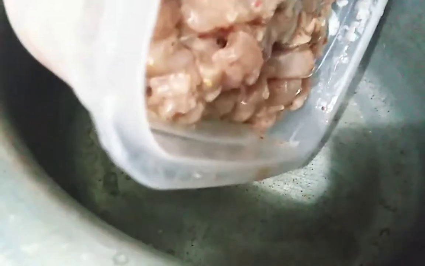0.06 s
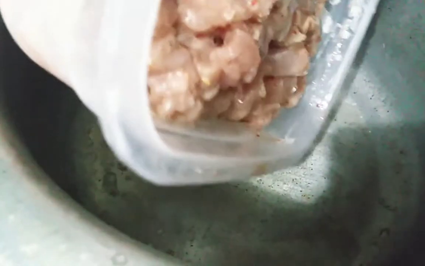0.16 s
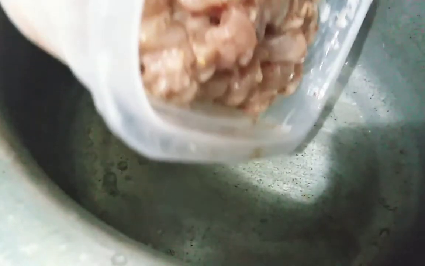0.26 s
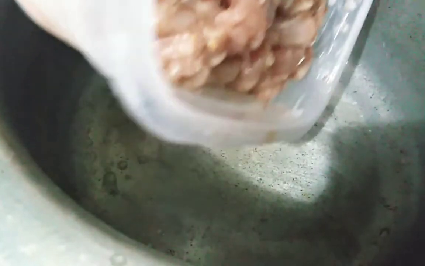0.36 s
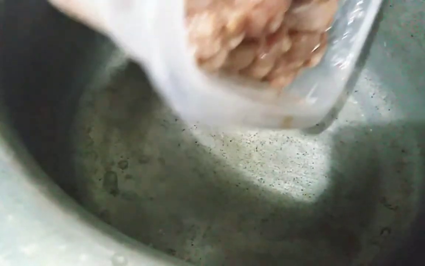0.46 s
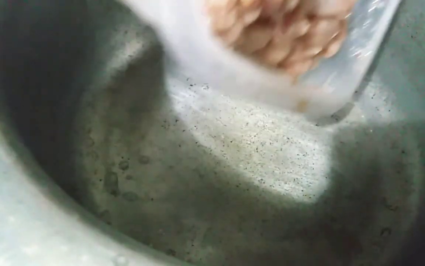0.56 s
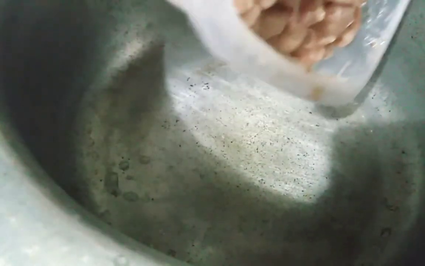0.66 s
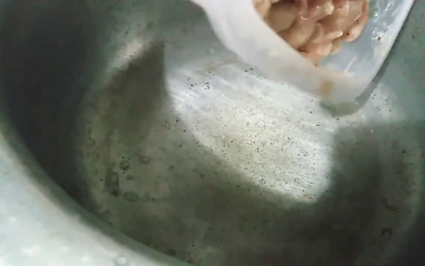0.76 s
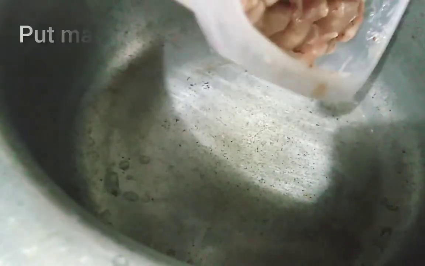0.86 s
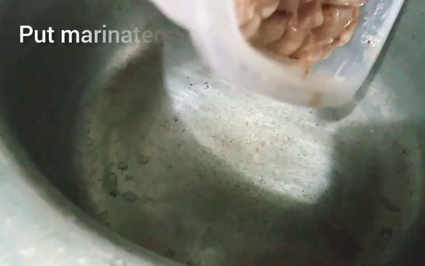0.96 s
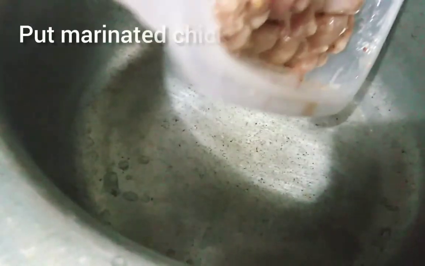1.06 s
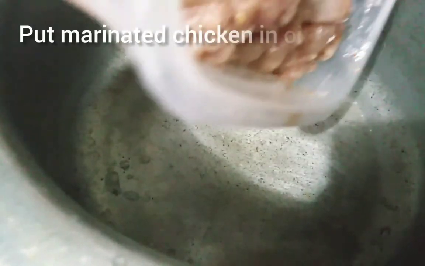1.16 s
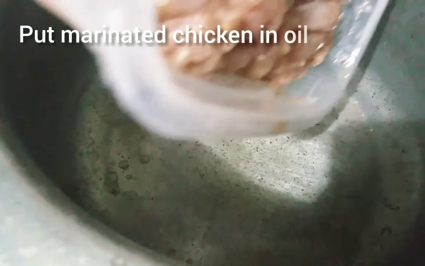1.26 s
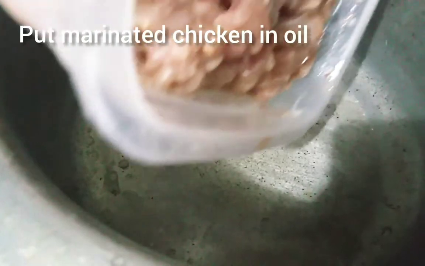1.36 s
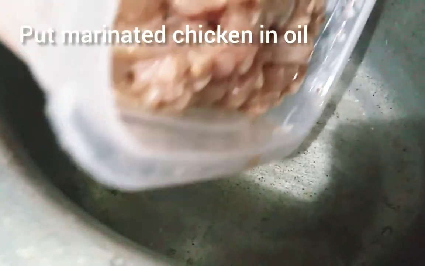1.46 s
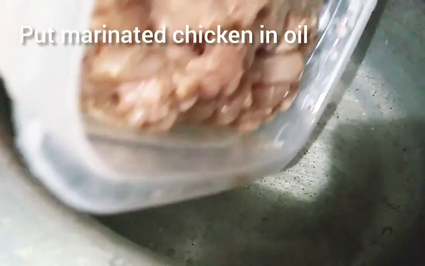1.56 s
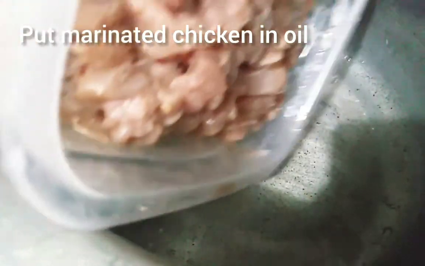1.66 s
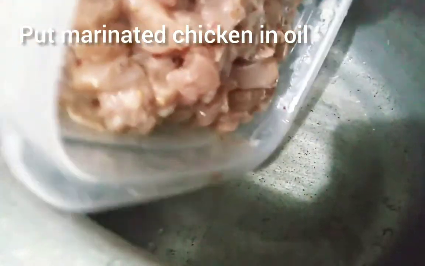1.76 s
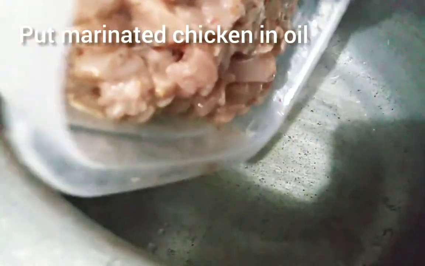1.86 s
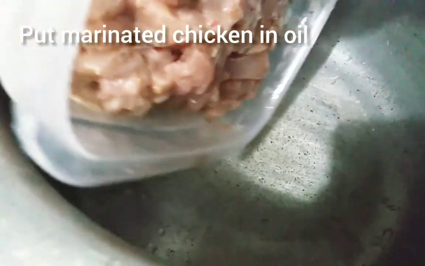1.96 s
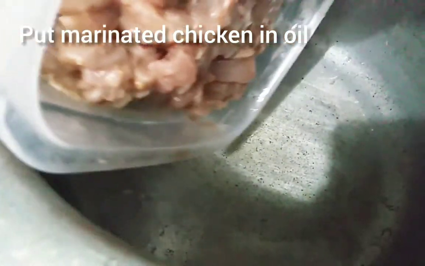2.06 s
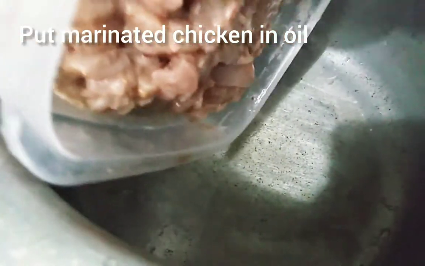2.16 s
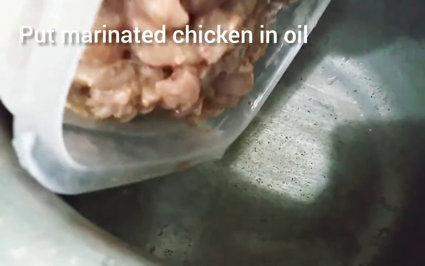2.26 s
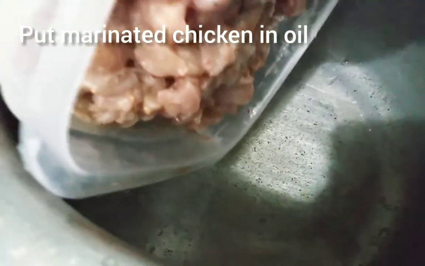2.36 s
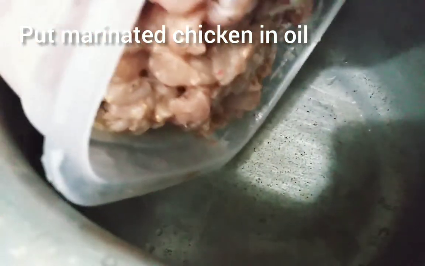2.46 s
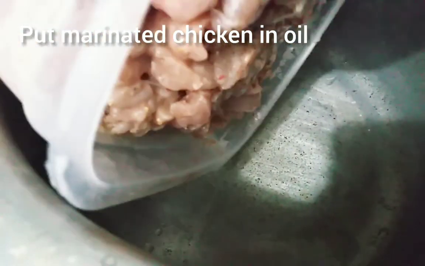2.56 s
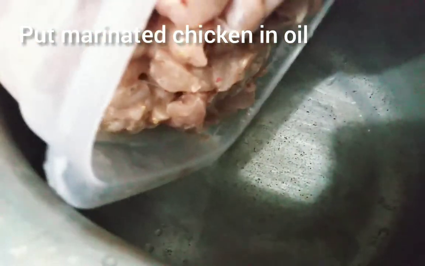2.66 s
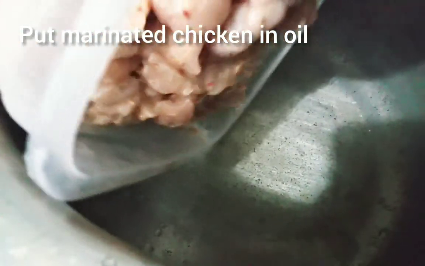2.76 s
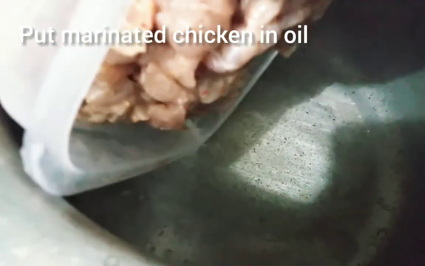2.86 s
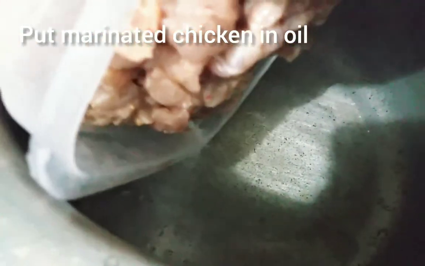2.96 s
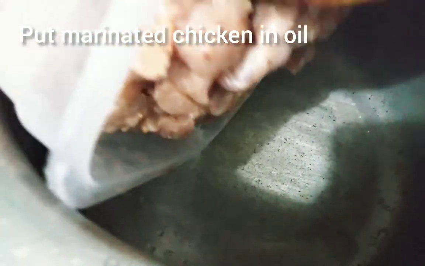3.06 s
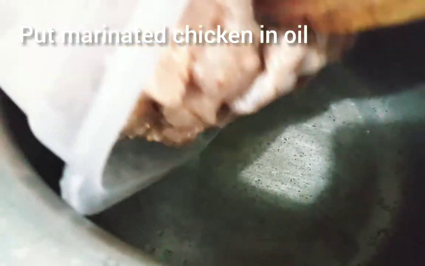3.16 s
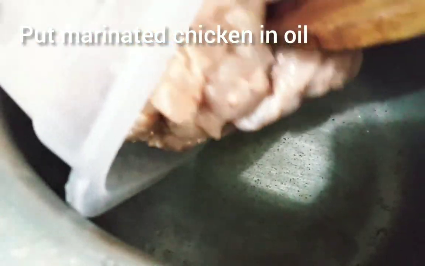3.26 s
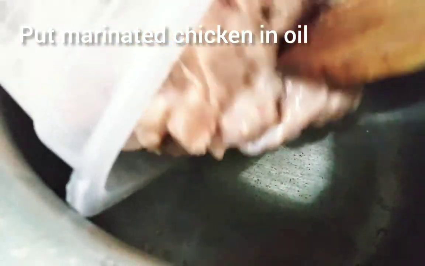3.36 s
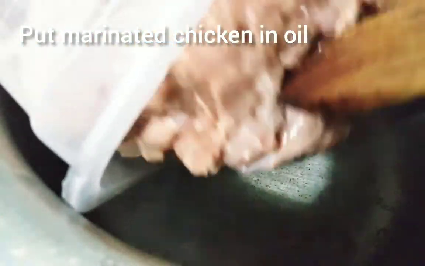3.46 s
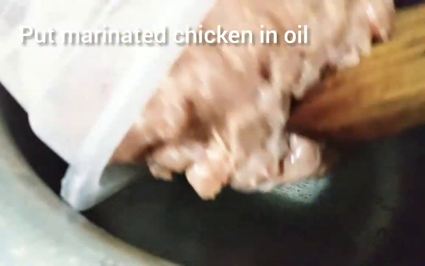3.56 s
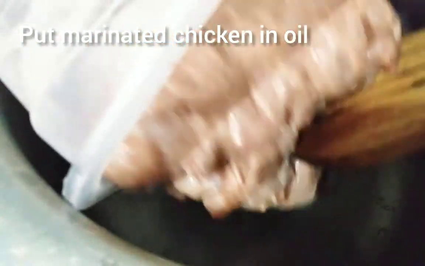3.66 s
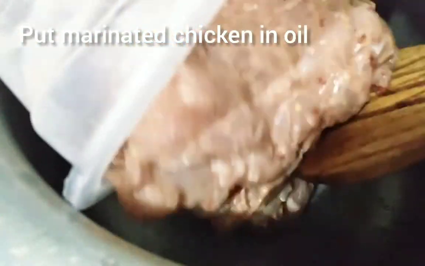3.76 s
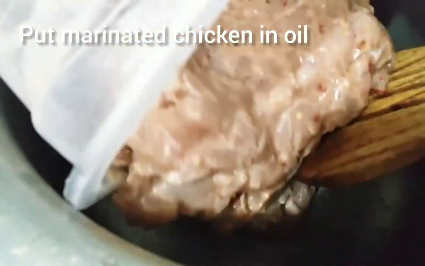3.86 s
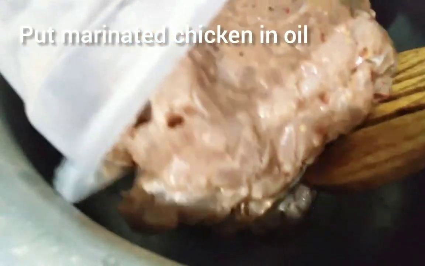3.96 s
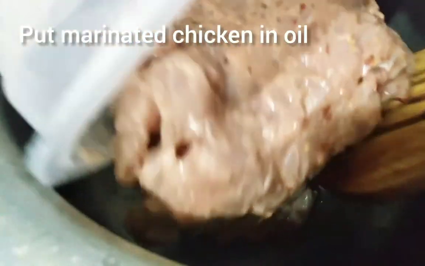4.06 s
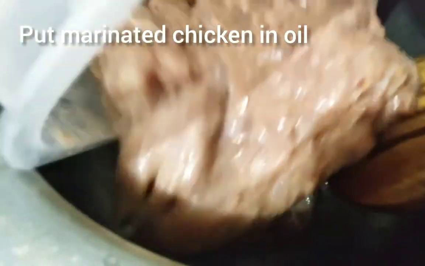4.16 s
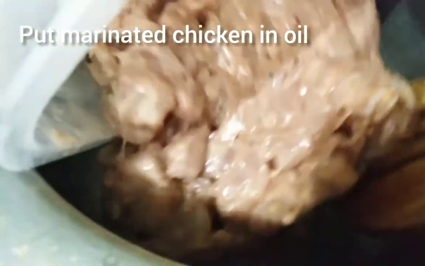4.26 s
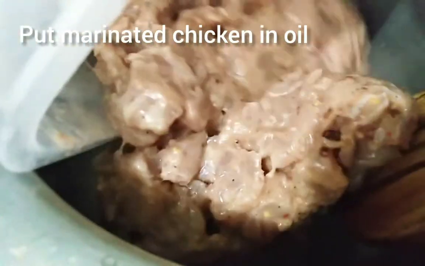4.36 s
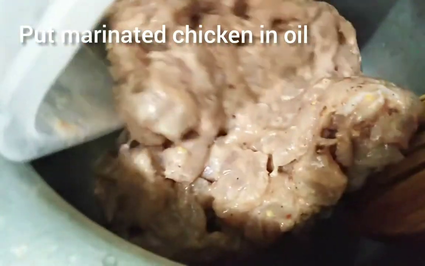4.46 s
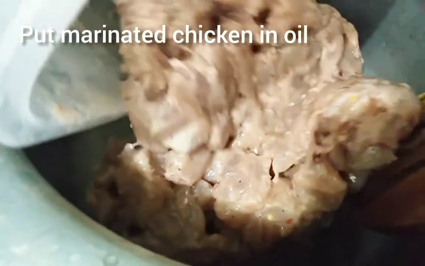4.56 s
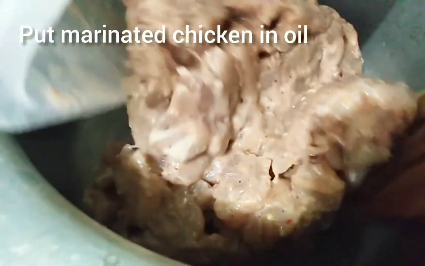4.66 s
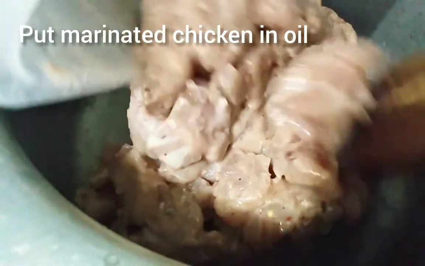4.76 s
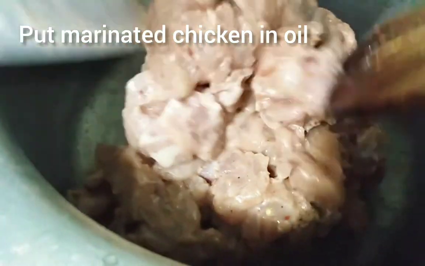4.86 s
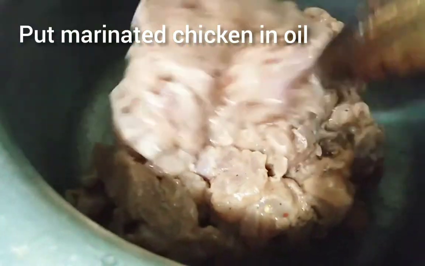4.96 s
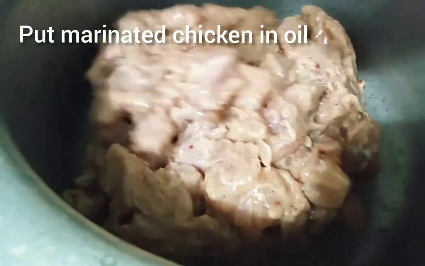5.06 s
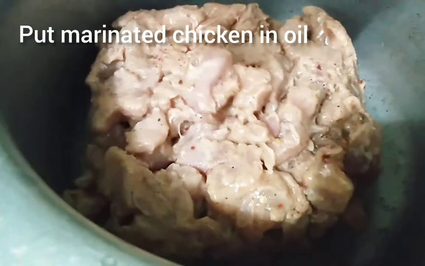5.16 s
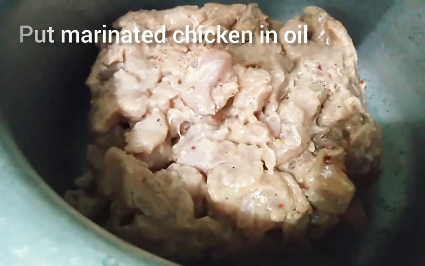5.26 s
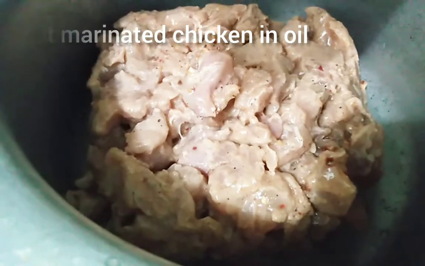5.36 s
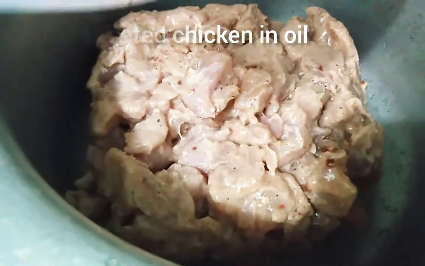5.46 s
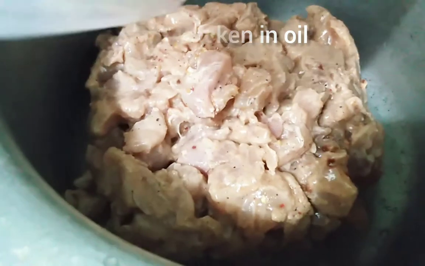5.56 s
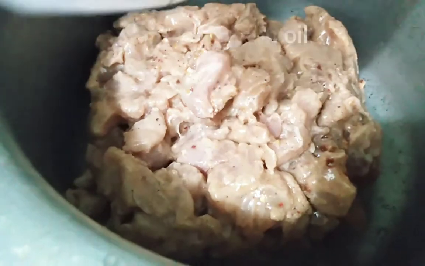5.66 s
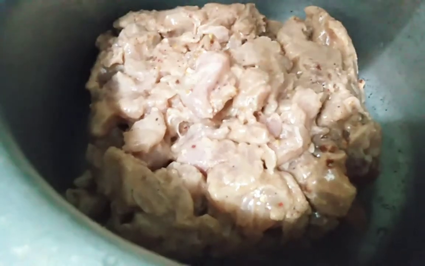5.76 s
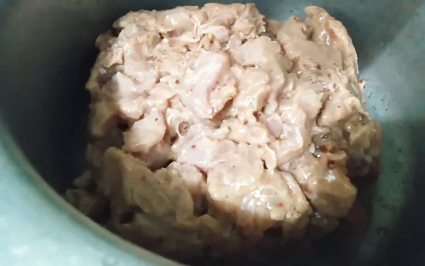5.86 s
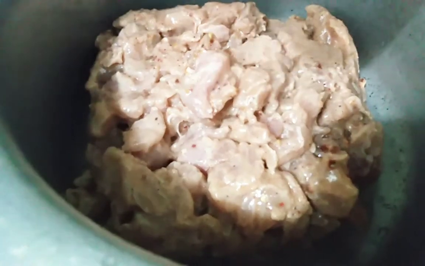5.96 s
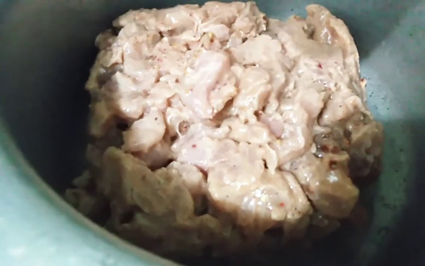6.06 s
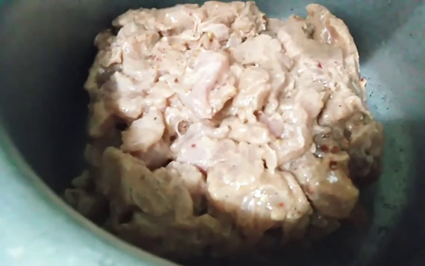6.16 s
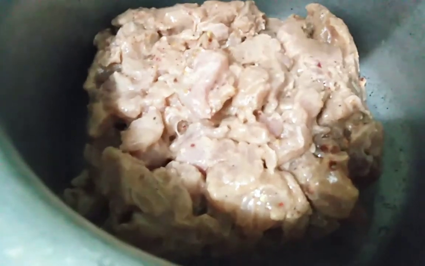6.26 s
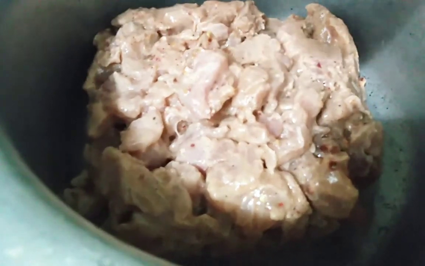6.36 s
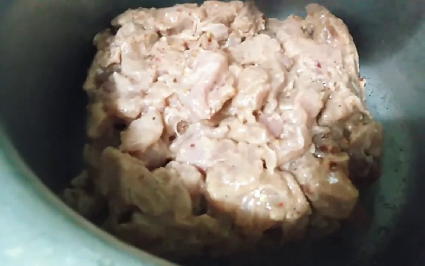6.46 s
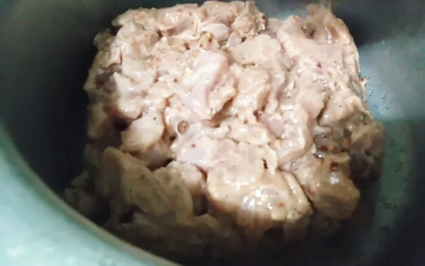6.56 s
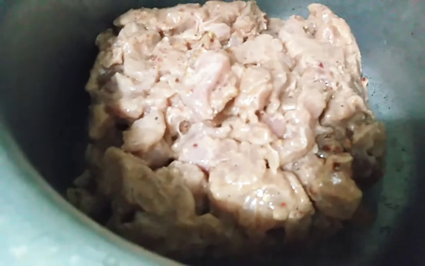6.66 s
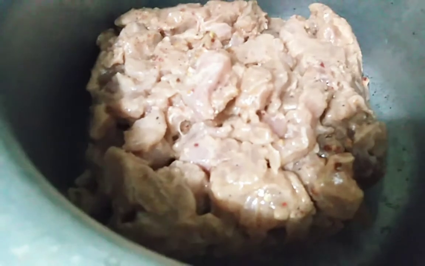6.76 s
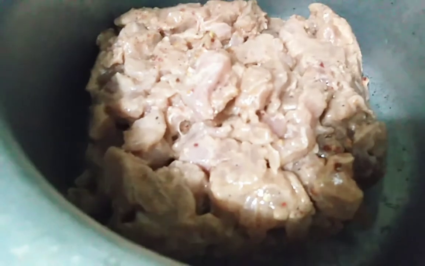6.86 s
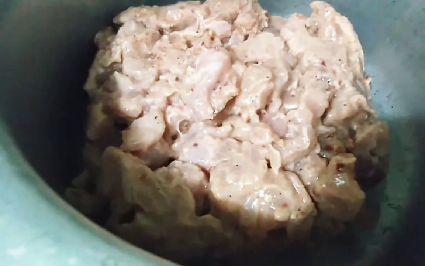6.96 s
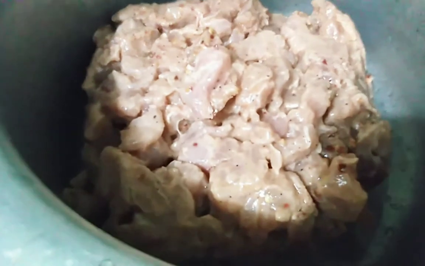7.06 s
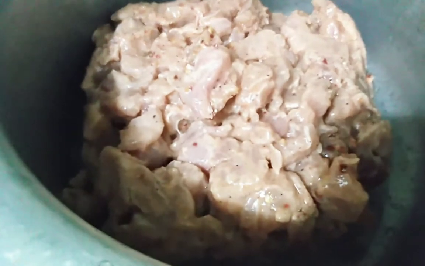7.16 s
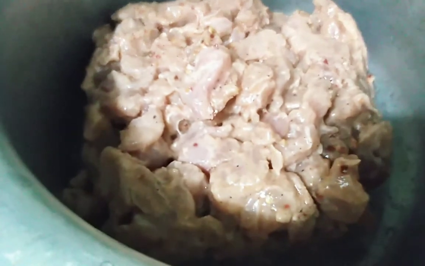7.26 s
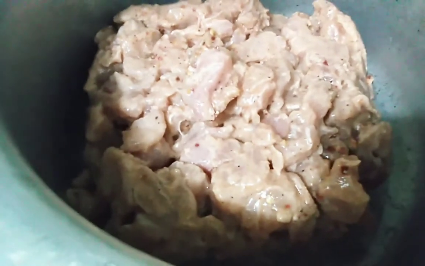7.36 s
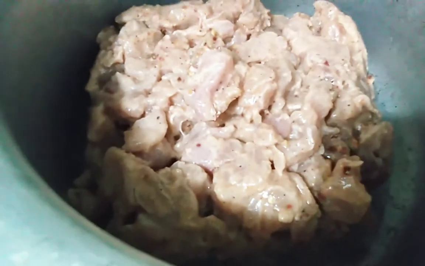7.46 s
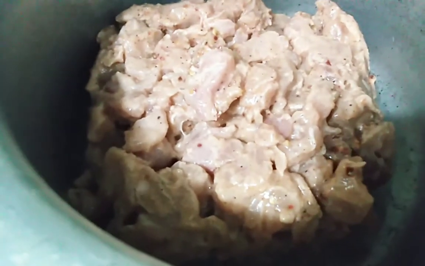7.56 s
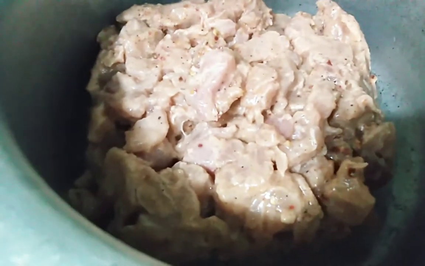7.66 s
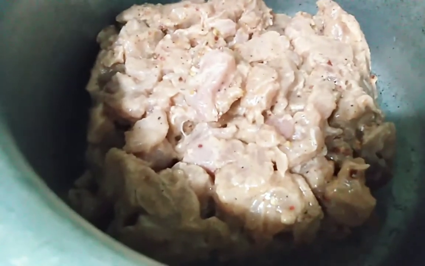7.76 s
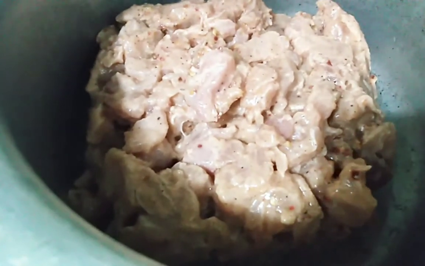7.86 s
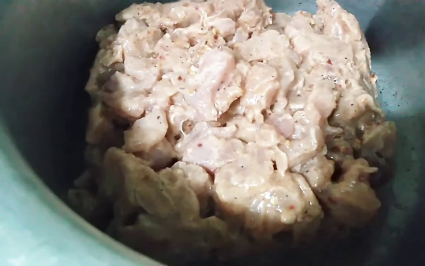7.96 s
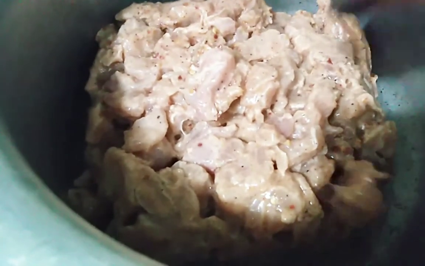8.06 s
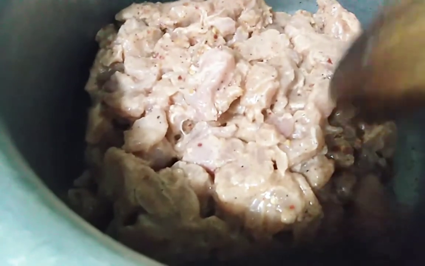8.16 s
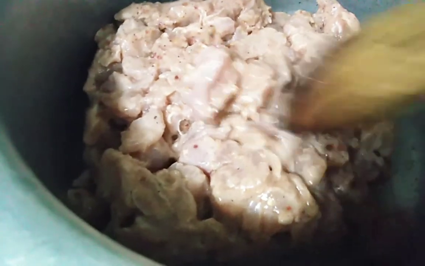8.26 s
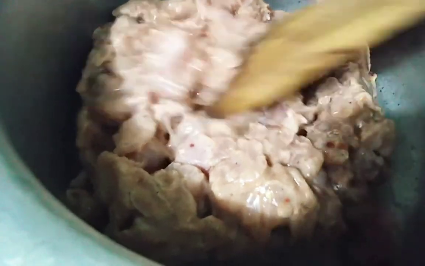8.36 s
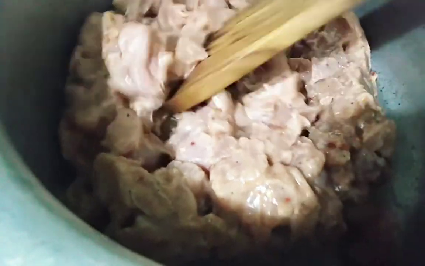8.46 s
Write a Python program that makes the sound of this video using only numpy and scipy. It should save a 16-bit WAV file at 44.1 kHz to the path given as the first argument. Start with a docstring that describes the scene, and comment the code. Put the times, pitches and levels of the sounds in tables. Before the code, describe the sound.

A small kitchen with a soft low rumble and faint thin whistles, heard close over a pot in stereo. Light plastic knocks from a wooden spoon on a tub come at 0.05 and 0.6 seconds, with a sharp double clack at 0.7, then near quiet. From 1.6 to 1.8 a rapid cluster of clacks rattles. Between 2.0 and 3.7 wet meat peels off in sticky snaps, increasingly dense, with a hard rim tap near 2.5 and a small squeak at 3.1. At about 3.7 the meat hits hot oil: a loud hissing, spitting sizzle surges, fullest near 4.9, saturating, with gurgles from 4.1 to 5.0. Hollow tub thuds land at 4.2, 4.7, repeatedly from 5.6 to 6.6, and again around 7.7 to 7.9. The sizzle gradually eases until 8, then rises slightly at the end, over a slowly growing deep drone.

```python
"""Marinated chicken dropped into hot oil

A wooden spoon knocks and scrapes a tub of marinated chicken over a pot: decaying modes inside dense clatter.
Wet meat peels off the plastic as pitched puffs of noise; the emptied tub thuds with its air note and overtones.
The meat lands in hot oil: streams of random bursts hiss, spit, seethe and gurgle until the input saturates.
Behind it the kitchen hums: shaped noise, narrow wavering whistles and a deep drone that grows."""
import sys
import numpy as np
from scipy import signal
from scipy.fft import rfft, irfft, next_fast_len
from scipy.io import wavfile
from scipy.ndimage import uniform_filter1d, map_coordinates

SR = 44100
rng = np.random.default_rng(int(sys.argv[2]) if len(sys.argv) > 2 else 0)


def file_out(sig):
    """Save sig as 16-bit WAV at sys.argv[1]."""
    # one column per channel
    cols = np.atleast_2d(sig).T
    # limit, then scale
    lim = np.clip(cols, -1, 1)
    pcm = np.round(lim * 32767).astype(np.int16)
    wavfile.write(sys.argv[1], SR, pcm)


N = 374858

# strength of the frying: (time [s], sizzle level [dB])
FRY = [(3.6, -45), (3.64, -49), (3.654, -32), (3.67, -24), (3.678, -16.5), (3.79, -8.5), (3.95, -8),
       (4.4, -7), (4.85, -5), (5.43, -7), (5.95, -9.5), (6.21, -9), (6.4, -9.5), (6.85, -10.5), (7.13, -12),
       (7.68, -12.5), (8.03, -13.5), (8.19, -13), (8.5, -11)]
FRY_START_S = FRY[0][0]
# resonance of the right microphone's port
PORT_HZ, PORT_WIDTH_HZ, PORT_RISE_DB = 7400, 1000, 7
LAG_S = 10 / SR  # the pot is nearer the right microphone


def amp(db):
    """Level in decibels to amplitude ratio."""
    return 10 ** (np.asarray(db) / 20)


def unit(x):
    """Normalisation to a root-mean-square value of 1."""
    return x / np.sqrt(np.mean(x ** 2) + 1e-20)


def along(points, hz):
    """Interpolation of (frequency [Hz], value) points on a logarithmic frequency axis."""
    f, v = np.transpose(points)
    return np.interp(np.log(hz + 1), np.log(f + 1), v)


def curves(rows):
    """Linear envelopes: one value per sample for each column after the time."""
    s, *cols = np.transpose(rows)
    return [np.interp(np.arange(N) / SR, s, c) for c in cols]


def wobble(rate):
    """Slow random modulation: a smooth curve through rate random knots a second."""
    knots = rng.standard_normal(int(N * rate / SR) + 4)
    return map_coordinates(knots, [np.arange(N) * rate / SR])


def filtered(x, response):
    """Linear filtering: the spectrum times a response of frequency."""
    m = next_fast_len(N + SR // 2)
    return irfft(rfft(x, m) * response(np.fft.rfftfreq(m, 1 / SR)), m)[..., :N]


def bump(hz, centre_hz, width_hz):
    """Resonance curve, 1 at its centre."""
    return 1 / (1 + (2 * (hz - centre_hz) / width_hz) ** 2)


def sides(db):
    """Stereo placement by level difference: left and right gains."""
    return amp(np.array([db / 2, -db / 2]))


def add(track, s, sound):
    """Superposition: mixes a sound in at time s."""
    track[:, round(s * SR):][:, :sound.shape[1]] += sound


def patched(x, patchy_db, size):
    """Random gain in patches of pitch and time, size = (bins, frames), alike on both sides."""
    z = signal.stft(x.astype(np.float32), nperseg=256)[2]
    field = uniform_filter1d(rng.standard_normal(z.shape[1:]), size[0], 0)
    field = uniform_filter1d(field, size[1], 1)
    return signal.istft(z * amp(patchy_db * unit(field)), nperseg=256)[1][:, :N]


def bursts(gain, spread_db, patchy_db, size=(5, 12)):
    """Impulsive noise of rms 1: a burst in every sample, strengths spread by spread_db, in drifting patches."""
    # coherence of the two sides: (frequency [Hz], left-right likeness [0 to 1])
    alike = [(60, 1), (700, 0.85), (1050, 0.53), (1500, 0.0038), (15000, 0)]
    strength_db = spread_db * np.minimum(rng.exponential(size=(2, N)), 7)
    pair = patched(rng.standard_normal((2, N)) * amp(strength_db), patchy_db, size)

    def mid_side_response(hz):
        # the cosine of twice this angle is the correlation of left and right
        angle = np.arccos(np.clip(along(alike, hz), 0, 1)) / 2
        return gain(hz) * [np.cos(angle), np.sin(angle)]

    mid, side = filtered(pair, mid_side_response)
    return unit(np.array([mid + side, mid - side]))


def ring(modes, low_db, split_hz, attack_s, t, scatter_db):
    """Modal decay after one blow: new strengths each time, long waves nearly in phase at both microphones."""
    flutter_db, flutter_per_s = 5, 80  # random level flutter of modes above 1100 Hz
    hz, db, t60 = np.transpose(modes)[:, :, None]
    chance = rng.standard_normal((4, len(modes), 1))
    phase = (.15 + np.clip(hz / 1500, 0, 1) ** 2 * 2) * chance[2:]  # [rad], one per side
    level = amp(db + scatter_db * chance[0] + low_db * (hz < split_hz) - 60 * t / t60)
    knots = rng.standard_normal((len(modes), int(t[-1] * flutter_per_s) + 2))
    flutter = np.array([np.interp(t * flutter_per_s, np.arange(len(row)), row) for row in knots])
    level = level * amp(flutter_db * flutter * (hz > 1100) * np.minimum(t * flutter_per_s, 1))
    pitch = hz * (1 + .005 * chance[1])
    tones = level * np.sin(2 * np.pi * pitch * t + phase)
    return tones.sum(axis=1) * (1 - np.exp(-t / attack_s))


def warbles(rows, waver):
    """Frequency-modulated tones that swell and die, their pitch unsteady by the share waver."""
    out = np.zeros((2, N + SR))
    for s, length_s, db, hz in rows:
        t = np.arange(round(length_s * SR)) / SR
        drift = uniform_filter1d(rng.standard_normal(SR // 4), size=200)[:len(t)]
        tone = np.sin(2 * np.pi * hz * np.cumsum(1 + waver * unit(drift)) / SR)
        pair = np.array([tone, np.roll(tone, -round(LAG_S * SR))])
        add(out, s, amp(db) * np.sin(np.pi * t / length_s) * pair)
    return out[:, :N]


def kitchen():
    """Broadband and narrow-band noise: a low rumble, and whistles of a wavering tone in a band of noise."""
    # rumble strength: (time [s], level [dB])
    hum = [(0, -37.5), (4.5, -38.5), (5.5, -36.5), (6.5, -38.5), (7.5, -34), (8.5, -34.5)]
    # rumble spectrum: (frequency [Hz], relative density [dB per Hz])
    rumble_colour = [(15, -70.5), (25, -42), (60, -22), (90, -7.5), (129, -1), (167, -5.5), (209, -3.5),
                     (244, -12), (280, -5), (368, -17), (460, -17.5), (537, -27.5), (796, -22.5),
                     (1030, -38.5), (1420, -48), (1500, -37), (1870, -73), (2100, -54), (5000, -64),
                     (6000, -120)]
    # narrow whistles of wavering pitch, perhaps the gas flame: (frequency [Hz], width [Hz], level [dB])
    whines = [(430, 44, -58.5), (681, 44, -61.5), (1240, 11.5, -74.5), (1659, 104, -61), (6900, 450, -55.5)]
    rumble = bursts(lambda hz: amp(along(rumble_colour, hz)), spread_db=0, patchy_db=3.5, size=(2, 10))
    out = amp(curves(hum)[0]) * rumble
    for centre_hz, width_hz, db in whines:
        pitch = centre_hz + 0.29 * width_hz * np.array([wobble(24), wobble(33)])
        tone = np.sin(2 * np.pi * np.cumsum(pitch, axis=1) / SR)
        band = bursts(lambda hz: bump(hz, centre_hz, width_hz) ** 2, spread_db=0, patchy_db=1.5)
        out = out + amp(db) * (.55 * tone + band)
    return out


def drone():
    """Narrow-band noise: a deep drone whose level rises linearly in decibels."""
    end_db, rise_db_per_s = -36, 8
    level_db = end_db + rise_db_per_s * (np.arange(N) - N) / SR
    return amp(level_db) * bursts(lambda hz: bump(hz, 84, 20) ** 2, spread_db=0, patchy_db=3)


def walls(x):
    """Reverberation: convolution with tails of frequency-dependent decay, a new tail every third of a second."""
    # reverberation time: (frequency [Hz], t60 [s])
    room = [(200, 0.43), (2000, 0.45), (5000, 0.31), (11000, 0.25)]
    uneven_tail_db = 5  # random unevenness of the tail across pitch and time
    out, step = np.zeros((2, N + SR)), SR // 3
    for start in range(0, N, step):
        piece = x[:, start:start + step]
        if not piece.any():
            continue
        hz, t, z = signal.stft(rng.standard_normal((2, SR // 2)), SR, nperseg=256)
        field = uniform_filter1d(rng.standard_normal(z.shape[1:]), size=14, axis=1)
        decay_db = uneven_tail_db * unit(field) - 60 * t / along(room, hz)[:, None]
        tail = signal.istft(z * amp(decay_db), SR, nperseg=256)[1]
        add(out, start / SR + 0.0043, signal.fftconvolve(piece, tail / np.linalg.norm(tail[0]), axes=1))
    return out[:, :N]


def swell(s, width_s, db, centre_hz, width_hz):
    """Band noise under a Gaussian envelope: a soft hiss that rises and falls once."""
    shape = np.exp(-((np.arange(N) / SR - s) / width_s) ** 2)
    return amp(db) * shape * bursts(lambda hz: bump(hz, centre_hz, width_hz) ** 2, spread_db=0, patchy_db=2)


def slide():
    """Impulsive noise in two bands: the meat creeps down the tub with a faint crackle that comes in clumps."""
    # moist crackle of the sliding meat: (time [s], level [dB])
    creep = [(0, -49.5), (.17, -60), (.45, -72), (1.25, -73), (1.6, -73), (1.89, -58), (2.12, -69),
             (2.4, -70), (2.7, -58), (2.9, -54), (3.09, -74), (3.27, -63), (3.4, -49.5), (3.47, -41),
             (3.57, -45), (3.7, -58)]
    middle_db, clumps_db = -4.5, 2.5  # middle band under the high one; chance clumping
    level_db, t = curves(creep)[0], np.arange(N) / SR
    high = bursts(lambda hz: bump(hz, 8000, 5000) ** 2, spread_db=3.5, patchy_db=4)
    middle = bursts(lambda hz: bump(hz, 3500, 5000) ** 2 * (hz > 1100),
                    spread_db=3.5, patchy_db=4.5, size=(3, 20))
    high = amp(level_db + clumps_db * wobble(21.6)) * high
    middle = amp(level_db + clumps_db * wobble(21.6) + middle_db) * middle
    return (t < creep[-1][0]) * (high + middle)


def rubs():
    """Friction squeaks: the wet tub rubs softly, each rub one unsteady tone."""
    # soft squeaks: (time [s], length [s], peak level [dB], pitch [Hz])
    squeaks = [(1.25, 0.046, -59, 2700), (3.11, 0.1, -50, 2690)]
    return warbles(squeaks, waver=0.026)


def smacks():
    """Resonantly filtered noise: each wet film snaps as a short puff around its own pitch."""
    # wet meat peeling off the plastic: (time [s], level [dB], pitch [Hz], left-right difference [dB])
    films = [(1.65, -23, 8700, 4), (1.88, -38.5, 11000, 6), (1.977, -39, 11000, 8.5),
             (1.992, -43, 11000, 8.5), (2.0246, -22.5, 6840, 4), (2.0604, -29, 6700, 7),
             (2.285, -47, 4500, 5), (2.355, -45, 5400, 5), (2.4954, -19.5, 7100, 12), (2.51, -30, 9000, 6),
             (2.541, -18, 5570, 5), (2.638, -24, 8550, 3), (2.661, -25.5, 6900, 8), (2.695, -26, 4150, 8),
             (2.685, -37, 4300, 10), (2.707, -20.5, 8900, 2), (2.788, -34, 11600, 12),
             (2.8923, -34, 3800, 7), (2.923, -26.5, 5750, 4), (3.038, -43, 4000, 5), (3.079, -14, 6750, 6),
             (3.114, -34.5, 2700, 5), (3.198, -22, 7700, 7), (3.223, -23, 6140, 6),
             (3.2445, -18, 7100, -1.5), (3.2597, -24, 6160, 7.5), (3.262, -37.5, 3050, 6),
             (3.3408, -34, 6600, 9), (3.363, -30, 7650, 11), (3.381, -40, 4500, 4), (3.41, -25.5, 5070, 2),
             (3.4158, -22, 3130, 0), (3.487, -19.5, 8200, 7), (3.49, -25.5, 3220, -1),
             (3.522, -32, 8500, 5), (3.568, -22.5, 4330, 6), (3.5914, -31, 2040, 2), (3.62, -35, 7000, 4),
             (3.655, -16, 7000, 2)]
    sharpness_q, body_db = 2.6, -14.5  # of each pitch; a broad snap under it
    out, t = np.zeros((2, N + SR)), np.arange(SR // 20) / SR
    broad = signal.butter(2, [1500, 9000], "band", fs=SR)
    for s, db, hz, pan_db in films:
        puff = rng.standard_normal((2, len(t))) * amp(-60 * t / .018) * (1 - np.exp(-t / .0005))
        band = signal.iirpeak(hz, sharpness_q, SR)
        tone = signal.lfilter(*band, signal.lfilter(*band, puff))
        body = signal.lfilter(*broad, puff)
        snap = tone / abs(tone).max() + amp(body_db) * body / abs(body).max()
        add(out, s, amp(db) * sides(pan_db)[:, None] * snap)
    return out[:, :N]


def knocks(rows, modes, ring_db, clatter_db, drier):
    """Impact of hard bodies: clear modes inside dense clatter; lighter blows ring less by drier dB a dB."""
    # bands of dense unresolved modes: (lower edge [Hz], upper edge [Hz])
    clatter_bands = [(70, 500), (400, 790), (1000, 4300), (5000, 7270)]
    clatter_t60_s = [0.042, 0.0147, 0.0264, 0.054]  # one per band
    out, t = np.zeros((2, N + SR)), np.arange(SR // 2) / SR
    onset = 1 - np.exp(-t / .0008)  # the clatter sets in softly
    bands = [signal.butter(2, edges, "band", fs=SR) for edges in clatter_bands]
    for s, db, thump_db, low_db, high_db, pan_db in rows:
        noise = rng.standard_normal((4, 2, len(t)))
        noise[:2, 1] = noise[:2, 0]  # the lows arrive alike on both sides
        clatter = 0
        for band, hiss, t60, gain_db in zip(bands, noise, clatter_t60_s, [thump_db, low_db, 0, high_db]):
            puff = signal.lfilter(*band, hiss * amp(-60 * t / t60) * onset)
            clatter = clatter + amp(gain_db) * puff / abs(puff).max()
        clear = ring(modes, low_db, 1000, 0.0006, t, scatter_db=2.5)
        blow = amp(ring_db + drier * db) * clear + amp(clatter_db) * clatter
        add(out, s, amp(db) * sides(pan_db)[:, None] * blow)
    return out[:, :N]


def rim_taps():
    """Impact excitation of the pot: the tub touches its rim."""
    # blows: (time [s], level [dB], thump [dB], low knock [dB], treble crack [dB], left-right difference [dB])
    taps = [(0.2763, -30.5, -13, 3, 2, 1), (2.0812, -34.5, 9, 8, 4, 2), (2.1086, -32, 4, -2, -5, 2),
            (2.4872, -15, -4.5, -15, -5, 0.5), (2.8519, -31, 8, 7, 2, -1)]
    # modes of the pot: (frequency [Hz], level [dB], t60 [s])
    pot_modes = [(452, -8, .07), (695, -3.5, .15), (712, -13, .09), (1690, -18, .15), (2810, -26, .08),
                 (4770, -30, .2)]
    return knocks(taps, pot_modes, ring_db=-1.5, clatter_db=-1, drier=0)


def spoon_knocks():
    """Impact excitation of the plastic tub: the wooden spoon strikes it."""
    # blows: (time [s], level [dB], thump [dB], low knock [dB], treble crack [dB], left-right difference [dB])
    clacks = [(0.0515, -18, 3.5, -8.5, -3, 2.5), (0.1196, -29, -16, -4, 2, 3),
              (0.16, -37, 17, -2, -12, 2.5), (0.6115, -19, -4, -4, -1, 2.5),
              (0.6925, -23, -16, -8.5, 3, 2.5), (0.6945, -10.5, -11, -9, 10.5, -1),
              (0.696, -7, -14, -1.5, 11, 2), (1.619, -28.5, -16, 3, -12, 4), (1.6708, -17, 0, 6.5, 12.5, 5),
              (1.6886, -8, -2.5, -12, 5.5, 1.5), (1.7, -15.5, 0, 4, -4, 2), (1.728, -17, -4, -4, -16, -8),
              (1.7435, -9.5, -6, -16, -3, 6), (1.7475, -8.5, -2.5, -6, -3, 0),
              (1.762, -25, 5.5, 0, -7.5, 7), (1.79, -31, 11.5, 5, -5, -0.5), (2.82, -32, 9, 13, -13, 3)]
    # modes of the tub: (frequency [Hz], level [dB], t60 [s])
    tub_modes = [(271, -19, 0.034), (494, -0.5, 0.14), (687, -4, 0.071), (1553, 3.5, 0.033),
                 (2032, 0, 0.039), (2246, -6, 0.054), (2407, -3.5, 0.082), (2777, -10, 0.058),
                 (2940, -11, 0.1), (3620, -10, 0.056), (3700, -33, 0.15), (4165, -13, 0.16),
                 (4510, -6.5, 0.055), (4670, -33, 0.33), (5300, -16, 0.059), (5530, -28, .07),
                 (6100, -8, 0.032), (6210, -26.5, 0.25), (6400, -23, 0.14), (6670, -19, 0.08),
                 (7270, -11, 0.088)]
    return knocks(clacks, tub_modes, ring_db=-6, clatter_db=-3, drier=.35)


def thuds():
    """Cavity resonance: soft blows sound the empty tub's air note and overtones, a deep push and a dull slap."""
    # blows: (time [s], level [dB], air note [Hz], its t60 [s], overtones [dB], strongest overtone [Hz],
    #         deep push [dB], slap [dB])
    blows = [(3.752, -36, 258, .1, 6, 604, 17, -18), (4.185, -3.5, 258, 0.062, -9, 853, -11, -5),
             (4.198, -26, 241, 0.11, 5, 487, 19.5, -16), (4.685, -4, 243, .05, -10, 685, -18, -15),
             (5.588, -7, 269, 0.1, -5, 542, -25, -19), (5.664, -4, 265, 0.1, -11, 840, -41, -19),
             (5.751, -32, 270, 0.17, -2, 610, -15, -17), (5.942, -8, 271, 0.1, -8, 752, -10, -12),
             (6.036, -5.5, 273, 0.072, -7, 823, -13, -15), (6.239, -10.5, 268, 0.13, -8, 530, -28, -35),
             (6.288, -12.5, 268, 0.14, 1, 524, -16, -6), (6.323, -24, 261, 0.15, -1, 530, -14, -14),
             (6.596, -20, 288, 0.14, 4.5, 860, 5, -3), (6.636, -24, 275, 0.2, -5, 604, 0, -17),
             (7.04, -34, 274, 0.17, -6.5, 565, -15, -20), (7.671, -10, 254, 0.099, -0.5, 927, -29, 6),
             (7.754, -16.5, 263, 0.1, -6, 608, -16, 9), (7.791, -22, 265, 0.094, -20, 604, -21, -21),
             (7.911, -16.5, 257, 0.12, -17, 550, 3, -20.5)]
    # overtones: (frequency [Hz], level [dB], t60 [s])
    hollow = [(401, -7.5, 0.11), (456, 3, 0.04), (546, -8, 0.1), (599, -2.5, 0.09), (684, -1.5, 0.036),
              (766, -5, 0.088), (834, -2, 0.062), (926, -9.5, 0.061), (950, -12, 0.025), (1300, -11, 0.022),
              (1680, -10, 0.025), (2200, -11, .015)]
    favour_db, favour_width_hz = 12, 45  # where the blow lands lifts one overtone
    out, t = np.zeros((2, N + SR)), np.arange(SR // 4) / SR
    push = np.sin(2 * np.pi * 160 * t) * amp(-60 * t / 0.044) * (1 - np.exp(-t / 0.0022))
    slap_band = signal.butter(1, (854, 1900), "band", fs=SR)  # the flat contact [Hz]
    slap_t60_s = 0.16
    for s, db, note_hz, t60, upper_db, favoured_hz, deep_db, slap_db in blows:
        struck = [(note_hz, 2.5, t60)]
        for hz, level_db, life_s in hollow:
            favour = favour_db * bump(hz, favoured_hz, favour_width_hz)
            struck.append((hz, level_db + upper_db + favour, life_s))
        body = ring(struck, 0, 0, 0.0011, t, scatter_db=1.5)
        slap = signal.lfilter(*slap_band, rng.standard_normal((2, len(t))) * amp(-60 * t / slap_t60_s))
        add(out, s, amp(db) * (body + amp(deep_db) * push + amp(slap_db) * slap / abs(slap).max()))
    return out[:, :N]


def glugs():
    """Bubble resonance: single big bubbles gurgle in the oil as short unsteady tones."""
    # gurgles: (time [s], length [s], peak level [dB], pitch [Hz])
    gurgles = [(4.14, 0.053, -17, 945), (4.35, 0.046, -20.5, 668), (4.36, 0.04, -17, 997),
               (4.83, 0.029, -19, 526), (4.84, 0.057, -20.5, 887), (4.9, 0.022, -16.5, 510),
               (4.94, 0.034, -12, 513), (5.02, 0.029, -14, 1084), (6.28, .07, -17.5, 548)]
    return warbles(gurgles, waver=0.011)


def spits(centre_hz, cycles, spread_db, shared, count, size):
    """Damped oscillation: short grains ring a few cycles; a share reaches both sides, the left one later."""
    when = rng.uniform(FRY_START_S * SR, N, count)
    pitch = rng.standard_normal(count)
    big = np.minimum(rng.exponential(size=count), 4)
    hz = np.clip(centre_hz * np.exp(.45 * pitch), 700, 12000)[:, None]
    k = np.arange(size)
    level_db = spread_db * big[:, None] - 60 * k * hz / SR / (3 * cycles)
    shape = amp(level_db) * np.sin(2 * np.pi * hz * k / SR)
    play = lambda start: np.bincount((start[:, None] + k).ravel(), shape.ravel(), N + SR)[:N]
    right = when.astype(int)
    # the rest are shifted by a random time on the left, so the sides differ
    shift = (rng.random(count) > shared) * rng.integers(0, SR // 2, count)
    return unit(np.array([play(right + round(LAG_S * SR) + shift), play(right)]))


def frying():
    """Vapour bubbles: water flashes to steam; fine ones hiss, middling ones spit, big ones seethe in the pot."""
    # bursting steam bubbles: (frequency [Hz], relative density [dB per Hz])
    steady_colour = [(1470, -27), (2500, -7.5), (2720, -20.5), (3070, -9.5), (3390, -16), (4460, -10),
                     (5000, -10), (6600, -2.5), (7420, -2), (8500, -4.5), (10400, -10), (11600, -17.5),
                     (13800, -20.5), (14500, -37), (15400, -70)]
    # the first wet burst is duller: (frequency [Hz], relative density [dB per Hz])
    first_colour = [(1180, -28.5), (2000, -10), (2580, -9), (3010, -5.5), (3310, -13.5), (3640, -7),
                    (6120, -2.5), (6840, -2), (7390, -2), (13700, -17), (15400, -58)]
    # larger bubbles under the meat: (frequency [Hz], relative density [dB per Hz])
    seethe_colour = [(180, -24.5), (300, -15), (420, -11.5), (543, 1), (720, -3.5), (955, -11.5),
                     (1080, -6), (1500, -6), (1950, -2.5), (3300, -120)]
    # air in the pot: (frequency [Hz], width [Hz], rise [dB])
    pot_air = [(530, 70, 3.5), (1059, 55, 5), (1940, 170, 4)]
    # microphone pair: (frequency [Hz], left-right difference [dB])
    lean = [(300, 0), (1400, -2), (2400, -1), (3900, 3), (6000, 2.5), (9000, 3.5), (14000, 2)]
    settle_s = 1.32  # the first burst gives way to the steady sizzle
    # level under the sizzle; weaker at first, until bubbles form; chance coming and going
    seethe_under_db, seethe_late_db, seethe_builds_s, seethe_flutter_db = -14.5, -20.5, 0.37, 1.1
    spit_under_db, spit_late_db, spit_builds_s, spit_flutter_db = -16.5, -15, 0.021, 1.4
    grains_db = -13.5  # level of short ringing grains under the hiss
    pan_shift_db, pan_shift_s, pan_takes_s = -1.5, 6.85, .25  # the hiss moves to the right once
    peak_grows = .55  # once moved, the right side gains this share more at its port's pitch
    air_s, air_takes_s = 4.75, .3  # the pot's air notes come up once the tub is out of the way

    t = np.arange(N) / SR
    since = t - FRY_START_S
    fading = lambda life_s: np.exp(-np.maximum(since, 0) / life_s)
    turned = lambda s, takes_s: (1 + np.tanh((t - s) / takes_s)) / 2  # from 0 to 1 around s
    air = lambda hz: amp(sum(db * bump(hz, c, w) for c, w, db in pot_air))

    sizzle_db, = curves(FRY)
    seethe_db = sizzle_db + seethe_under_db + seethe_late_db * fading(seethe_builds_s)
    seethe_db = seethe_db + seethe_flutter_db * wobble(15)
    spit_db = sizzle_db + spit_under_db + spit_late_db * fading(spit_builds_s)
    spit_db = spit_db + spit_flutter_db * wobble(15)
    moved = turned(pan_shift_s, pan_takes_s)
    pan_db = pan_shift_db * moved + 0.37 * wobble(32)
    surge_db = 0.094 * wobble(17) + 0.52 * wobble(40)

    first = bursts(lambda hz: amp(along(first_colour, hz)), spread_db=3, patchy_db=3.5, size=(1, 14))
    later = bursts(lambda hz: amp(along(steady_colour, hz)), spread_db=3, patchy_db=3.5, size=(1, 14))
    grains = spits(centre_hz=6000, cycles=9.0, spread_db=3.5, shared=0.3, count=20000, size=56)
    fresh = fading(settle_s)
    fine = np.sqrt(fresh) * first + np.sqrt(1 - fresh) * later + amp(grains_db) * grains

    bubbles = spits(centre_hz=2423, cycles=12.0, spread_db=2.2, shared=0.6, count=12000, size=160)
    middling = unit(filtered(patched(bubbles, patchy_db=4, size=(1, 18)), air))
    upper = amp(sizzle_db + surge_db) * sides(pan_db) * fine + amp(spit_db + surge_db) * middling
    upper[1] += peak_grows * moved * filtered(upper[1], lambda hz: bump(hz, PORT_HZ, PORT_WIDTH_HZ))
    upper = filtered(upper, lambda hz: sides(along(lean, hz)))

    muffled = bursts(lambda hz: amp(along(seethe_colour, hz)), spread_db=1.5, patchy_db=2, size=(1, 14))
    opened = turned(air_s, air_takes_s)
    big = (1 - opened) * muffled + opened * unit(filtered(muffled, air))
    return (since > 0) * (upper + amp(seethe_db + .5 * surge_db) * big)


def scene():
    """Superposition of the kitchen, the tub with its reverberation, and the frying."""
    hard = spoon_knocks() + rim_taps()
    wet = smacks() + rubs()
    echo = amp(-7.0) * walls(hard + amp(-3.0) * wet)
    near = hard + wet + echo + thuds() + slide()
    faint_hiss = swell(s=1.17, width_s=0.14, db=-53.5, centre_hz=7840, width_hz=2400)
    steam_spurt = swell(s=4.29, width_s=.03, db=-18, centre_hz=2850, width_hz=900)
    return near + faint_hiss + steam_spurt + frying() + glugs() + kitchen() + drone()


def record(dry):
    """Transducer response and saturation: deep bass lost, the right port's pitch lifted, peaks squeezed."""
    bass_cut = lambda hz: hz ** 2 / (hz ** 2 + 45 ** 2)
    port_db = lambda hz: [[0], [PORT_RISE_DB]] * bump(hz, PORT_HZ, PORT_WIDTH_HZ)  # left, right
    heard = filtered(dry, lambda hz: amp(port_db(hz)) * bass_cut(hz))
    squeezed = heard / (1 + abs(heard / 1.1) ** 5) ** (1 / 5)
    return filtered(squeezed, lambda hz: hz < 15550)


dry = scene()
out = record(dry)
file_out(out)
```